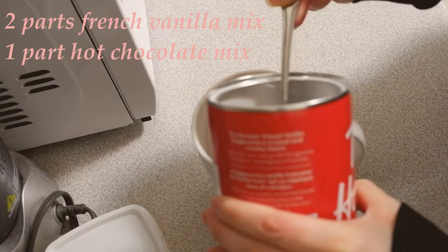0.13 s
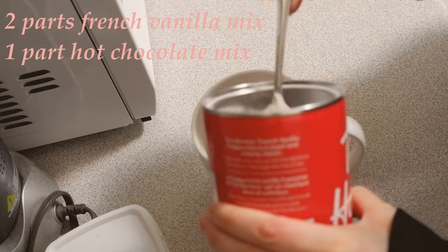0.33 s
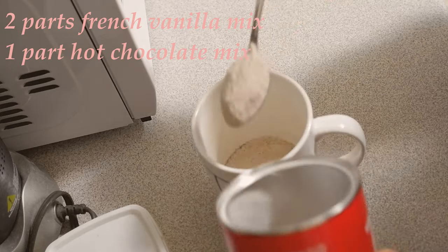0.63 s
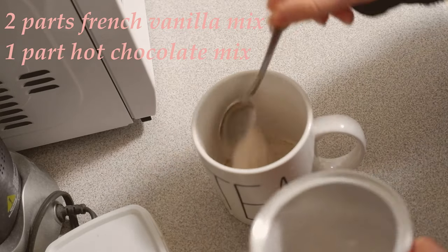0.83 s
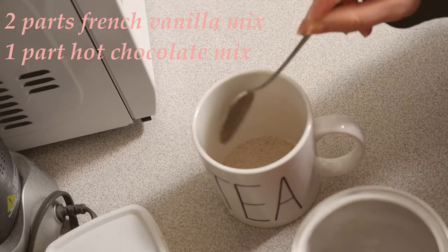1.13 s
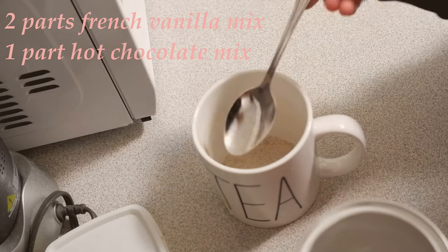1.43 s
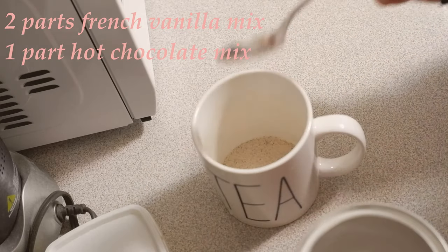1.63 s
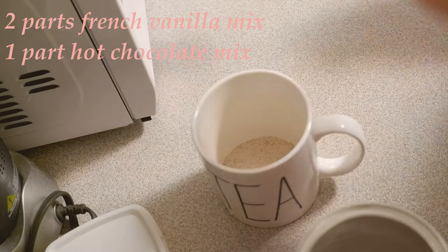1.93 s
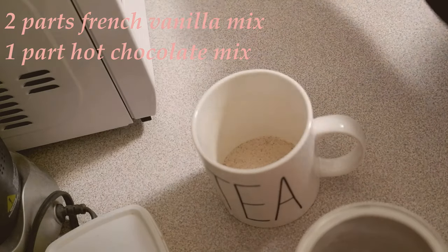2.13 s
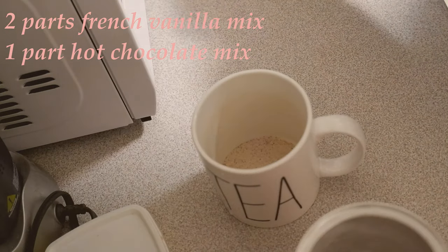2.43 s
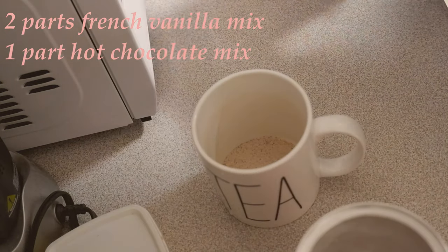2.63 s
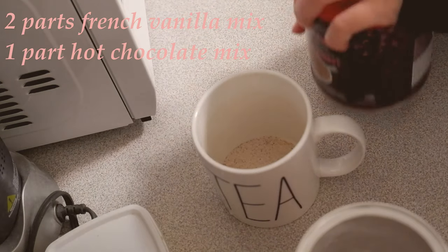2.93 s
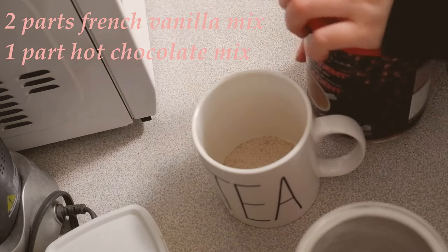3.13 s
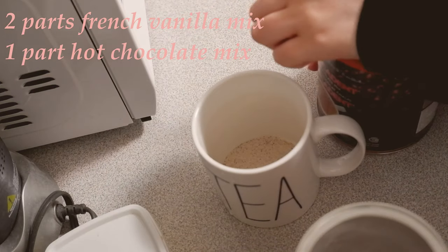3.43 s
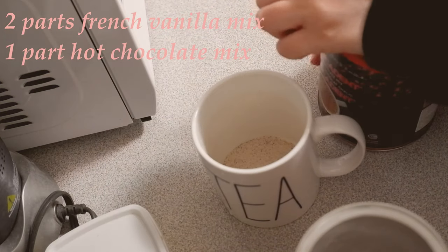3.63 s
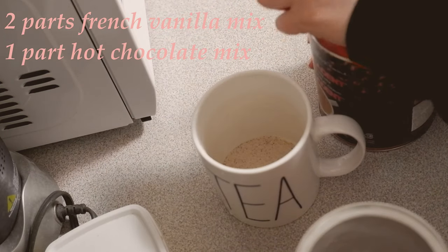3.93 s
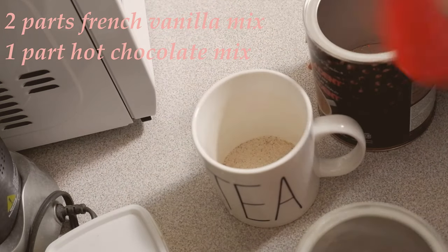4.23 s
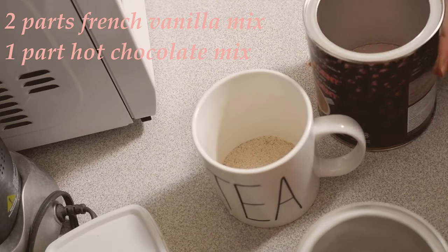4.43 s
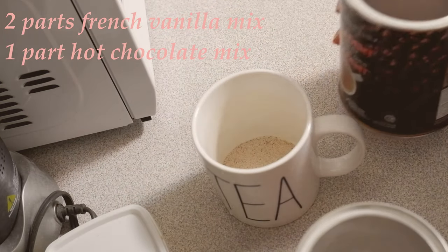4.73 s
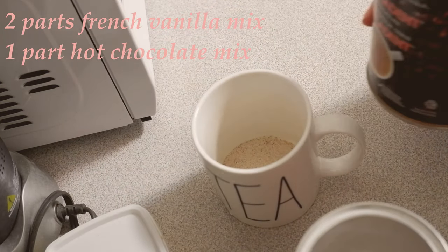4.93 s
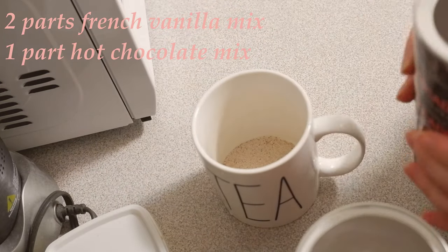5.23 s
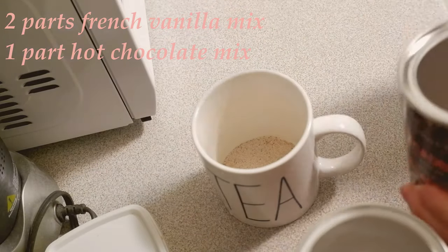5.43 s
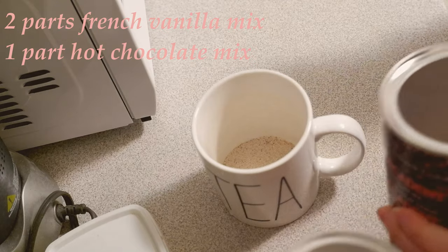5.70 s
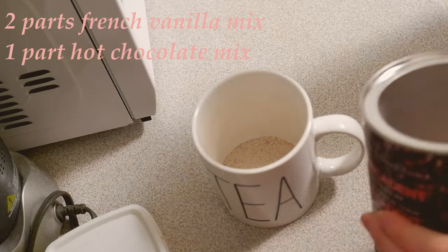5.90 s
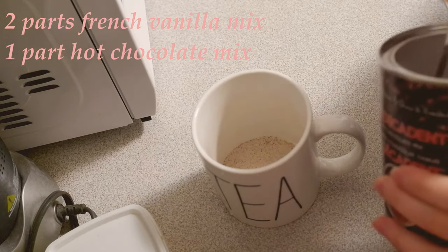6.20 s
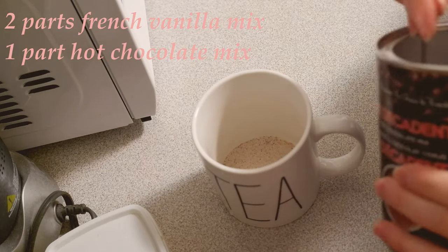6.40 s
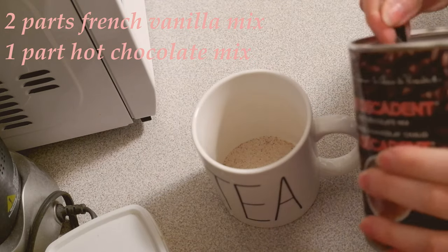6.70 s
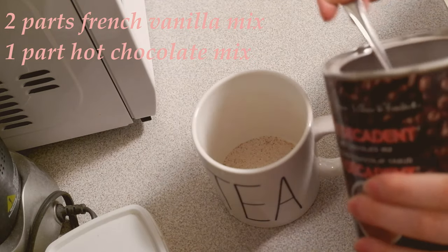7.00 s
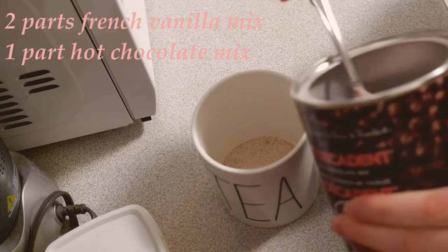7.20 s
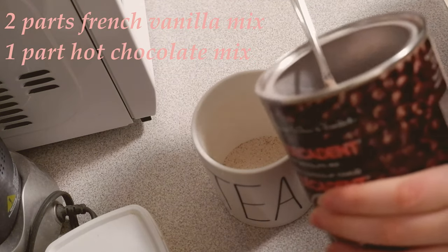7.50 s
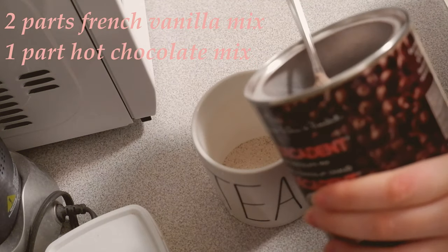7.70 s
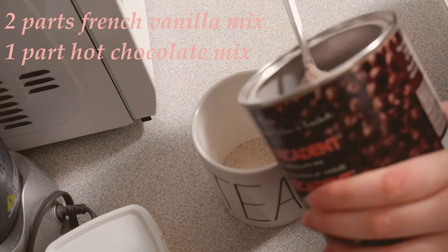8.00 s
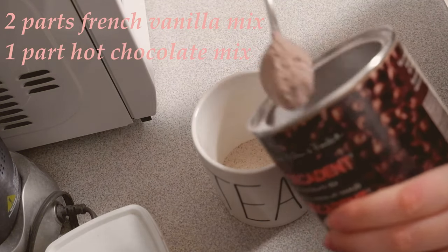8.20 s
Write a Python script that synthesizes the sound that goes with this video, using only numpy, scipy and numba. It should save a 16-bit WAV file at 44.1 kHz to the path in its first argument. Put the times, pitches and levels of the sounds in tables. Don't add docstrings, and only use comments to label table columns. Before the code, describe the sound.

Over a low fridge hum, a spoon knocks a mug, a can thuds down, its lid pops off and clacks, then a spoon digs in powder.

```python
import sys
import numpy as np
from scipy import signal
from scipy.fft import rfft, irfft, next_fast_len
from scipy.io import wavfile
from scipy.ndimage import uniform_filter1d
from numba import njit

SR = 44100
rng = np.random.default_rng(int(sys.argv[2]) if len(sys.argv) > 2 else 0)


def boost(x):
    u = np.asarray(x, float) / 20
    return 10 ** u


def generate_wav(sig):
    pcm = np.round(np.clip(np.atleast_2d(sig).T, -1, 1) * 32767).astype(np.int16)
    wavfile.write(sys.argv[1], SR, pcm)


N = 368235
T = np.arange(N) / SR


def shape(x, points, in_db=True):
    size = next_fast_len(x.shape[-1], real=True)
    log_hz = np.log(np.fft.rfftfreq(size, 1 / SR) + 1)
    point_hz, value = np.transpose(points)
    gain = np.interp(log_hz, np.log(point_hz), value)
    if in_db:
        gain = boost(gain)
    return irfft(rfft(x, size) * gain, size)[..., :x.shape[-1]]


def band(x, lo_hz, hi_hz):
    return signal.sosfilt(signal.butter(2, [lo_hz, hi_hz], "bandpass", fs=SR, output="sos"), x)


def unit(x):
    return x / np.sqrt(np.mean(x ** 2))


def head_unit(x):
    return x / np.sqrt(np.mean(x[..., :300] ** 2))


def walk(rate_hz, size=N):
    hold = int(SR / rate_hz)
    steps = np.repeat(rng.standard_normal(size // hold + 1), hold)
    return unit(uniform_filter1d(uniform_filter1d(steps, hold), hold)[:size])


def left_right(db):
    return boost(np.array([[db], [-db]]) / 2)


# hz, side_over_mid (plain ratio)
UNLIKE = [(100, 0.035), (700, 0.24), (1500, 0.59), (3000, 0.72), (8000, 0.84)]


def diffuse(size=N):
    mid, side = rng.standard_normal((2, size))
    return mid + shape(side, UNLIKE, in_db=False) * np.array([[1], [-1]])


# pitch_hz, fall_by_60_db_s
ROOM_T60 = [(150, 0.53), (600, 0.23), (2000, 0.24), (6000, 0.14), (14000, 0.46)]


def room(x):
    tail, t = 0, T[:16384]
    hz, t60_s = np.transpose(ROOM_T60)
    for centre in 90 * 2 ** np.arange(0, 7.5):
        t60 = np.interp(np.log(centre), np.log(hz), t60_s)
        fade = 1000. ** (-t / t60) * np.clip(t / 0.0057, 0, 1)
        tail = tail + band(diffuse(size=16384), centre / np.sqrt(2), centre * np.sqrt(2)) * fade
    tail = tail / np.sqrt(np.sum(tail[0] ** 2))
    return x + boost(-5) * signal.fftconvolve(x.mean(axis=0)[None], tail)[:, :N]


# pitch_hz, level_db, wander_hz, waver_db
HUM = [(58.8, -40, 0.18, -0.5), (119.8, -42, 1, -0.5)]
# pitch_hz, width_hz, level_db
BOOM = [(174.2, 18, -49.5), (231.2, 9.8, -42), (252.3, 10.9, -46), (327.6, 13, -60.5), (431.3, 18, -60),
        (983.4, 17, -66)]
# pitch_hz, level_db
AIR = [(15, -44), (25, -10.5), (53, -19.5), (122, -4), (178, -5), (240, -6), (305, -9.5), (552, -15.5),
       (871, -26), (970, -22), (1660, -32), (2170, -32.5), (4150, -45.5), (9810, -54.5), (15500, -68)]


def fridge():
    out = boost(-42.5 + .5 * walk(3.01)) * unit(shape(diffuse(), AIR))
    for hz, db, wander_hz, waver_db in HUM:
        phase = 2 * np.pi * np.cumsum(hz + wander_hz * walk(18)) / SR
        out = out + boost(db + waver_db * walk(7.8)) * np.sqrt(2) * np.sin(phase)
    for hz, width_hz, db in BOOM:
        out = out + boost(db) * unit(band(diffuse(), hz - width_hz / 2, hz + width_hz / 2))
    return out


def played(strokes, over_db=0, lean=0):
    t, rows = T[::32], np.array(strokes).T[:, :, None]
    peak_s, rise_s, fall_s, level_db = rows[:4]
    away = np.maximum((peak_s - t) / np.abs(rise_s), (t - peak_s) / np.abs(fall_s))
    db = level_db + over_db + lean * rows[-1] - 15 * np.minimum(away, 20) ** 1.35
    return np.interp(T, t, np.sqrt(np.sum(boost(db) ** 2, axis=0)))


# strongest_s, rise_s, fall_s, level_db
COUNTER = [
    (1.152, 0.0037, 0.042, -27),
    (1.279, 0.031, 0.023, -35),
    (1.58, 0.04, 0.068, -33),
    (3.578, 0.02, 0.042, -25.5),
    (3.79, 0.0091, 0.024, -24),
    (5.502, 0.032, 0.096, -34),
    (5.75, 0.17, .2, -35),
    (5.86, 0.067, 0.18, -32.5),
]


def counter_thumps():
    return played(COUNTER) * unit(band(rng.standard_normal(N), 69, 167))


def shaken(slips, modes):
    out, size = 0, slips.shape[1]
    for hz, db, t60 in modes:
        radius, turn = 1000. ** (-1 / (t60 * SR)), 2 * np.pi * hz / SR
        drift = np.repeat(walk(32 * 14, size=size // 32 + 1), 32)[:size]
        resonator = [0, np.sin(turn)], [1, -2 * radius * np.cos(turn), radius ** 2]
        out = out + signal.lfilter(*resonator, slips * boost(db + 2.5 * drift))
    return out


# rumble_over_scrape_db, hiss_over_scrape_db
RUBBED = dict(hands=(0.25, -8), lid=(-10, -22), stab=(-10, -11.5), dig=(-28, -11.5), scoop=(-0.5, -23))


def rubbing(strokes, kind, modes, edges_hz, drag_db, body_share):
    first = int(max(strokes[0][0] - .5, 0) * SR)
    last = min(int((strokes[-1][0] + .5) * SR), N)
    size, out = last - first, np.zeros((2, N))
    grain_db = 2.5 * walk(350, size=size) + drag_db * walk(60, size=size)
    slips = diffuse(size=size) * boost(grain_db)
    bare = unit(shape(slips, [(300, 3.5), (1500, -7.5), (5000, -20.5), (14000, -21.5)]))
    rub = body_share * unit(shaken(slips, modes)) + (1 - body_share) * bare
    rumble_db, hiss_db = RUBBED[kind]
    for k, over_db in enumerate((rumble_db, 0, hiss_db)):
        lo, hi = edges_hz[k:k + 2]
        part = unit(band(band(rub, lo, hi), 1.02 * lo, 1.03 * hi))
        out[:, first:last] += played(strokes, over_db, lean=k - 1)[first:last] * part
    return out


def ring(modes, detune, favour_hz=0):
    hz, db, t60 = np.transpose(modes)[:, :, None]
    share, shift, sign = rng.standard_normal((3, len(modes), 1))
    if favour_hz:
        db = db - 3.1 * np.abs(np.log2(hz / favour_hz))
        sign = sign + 1
    t = T[:4096]
    wave = np.sign(sign) * np.sin(2 * np.pi * hz * (1 + detune * shift) * t)
    return np.sum(boost(db + 3.3 * share) * wave * 1000. ** (-t / t60), axis=0)


# bright_tick_over_crack_db, left_minus_right_db
STRUCK = dict(mug=(-18, -3), can=(-9, -1.9), pry=(-15, -2.2), seal=(7, -2.2), lid=(1.4, -3.5),
          spoon=(-6, -2.5), scoop=(-15, -1.1), finger=(-11.5, -1.9))


def knocks(rows, kind, body, split_hz, push_s, crack_s, rattle_db, rattle_s, edge=None, edge_db=-2):
    out = np.zeros((2, N + 4096))
    t = T[:4096]
    push = np.hanning(int(push_s * SR) + 3)
    crack = np.exp(-t / crack_s) + 1.1 * np.exp(-t / 0.0006)
    tick_db, pan_db = STRUCK[kind]
    for s, body_db, hard_db, hz in rows:
        rattle = band(diffuse(size=4096) * np.exp(-t / rattle_s), hz / 2, 2 * hz)
        rattle = head_unit(band(rattle, 190, split_hz))
        body_ring = np.convolve(ring(body, 0.015, favour_hz=hz), push)[:4096]
        low = head_unit(body_ring) + boost(rattle_db) * rattle
        mid = head_unit(band(diffuse(size=4096) * crack, split_hz, 5500))
        if edge:
            mid = mid + boost(edge_db) * head_unit(ring(edge, 0.0075))
        top = head_unit(band(diffuse(size=4096) * crack, 4400, 12600))
        hit = boost(body_db) * (low + boost(hard_db) * (mid + boost(tick_db) * top))
        i = int(s * SR)
        out[:, i:i + 4096] += hit * left_right(pan_db)
    return out[:, :N]


# pitch_hz, level_db, fall_by_60_db_s
TIN = [(450, 13.5, 0.019), (607, 19.5, 0.039), (1050, -18, 0.026), (1250, 13, 0.031), (1420, 10, 0.065),
       (1658, 4.5, 0.04), (2072, 7.5, 0.027), (2474, 7, 0.029)]
# strongest_s, rise_s, fall_s, pressure_db, brightness_db
HANDS = [(0.0, .01, 0.21, -76.5, 17.5), (.238, 0.045, 0.14, -73.5, -27), (.422, 0.045, 0.11, -65.5, -24),
         (1.42, 0.034, 0.21, -60.5, -6), (1.54, 0.033, 0.046, -54, -19.5), (1.75, 0.074, 0.11, -58, -7),
         (2.2, 1, 0.22, -62.5, 0), (2.33, 0.019, 0.13, -50, -5.5), (2.46, 0.054, 0.06, -53.5, -21),
         (2.8, 0.44, 0.14, -58.5, -0.5), (2.98, .1, 0.68, -60.5, -7), (3.22, 0.12, 0.11, -53, 0.5),
         (3.51, 0.25, 0.079, -52, -1.5), (4.08, 0.19, 0.41, -55, -9), (4.56, 0.16, 0.13, -57, -10),
         (5.18, .012, 0.35, -54.5, 7), (5.402, 0.018, 0.068, -48.5, 10), (5.63, 0.041, 0.1, -49.5, -8.5),
         (5.76, 0.12, 0.11, -47, -7), (5.86, 0.2, .11, -41, -9)]


def hands_rub():
    return rubbing(HANDS, "hands", TIN, (300, 1300, 4000, 13000), drag_db=.8, body_share=.13)


# start_s, level_db, crack_over_body_db, pitch_hz
FINGER_TICKS = [(1.796, -38, -9, 608), (2.23, -47.5, -1.5, 584), (2.325, -54, 7, 686),
                (2.421, -41.5, -4.5, 544), (2.464, -31, -20, 923), (2.656, -45.5, -3, 560),
                (2.866, -32, -26, 1440), (2.895, -35, -16, 501), (2.916, -38.5, -7.5, 1080),
                (3.097, -38.5, -7.5, 773), (3.199, -39, -3, 1370), (5.171, -51, 14, 533),
                (5.271, -47, 9, 573), (5.368, -35, -2.5, 544), (5.494, -36, -12, 514)]


def finger_ticks():
    return knocks(FINGER_TICKS, "finger", TIN, 1830,
                  push_s=0.00033, crack_s=0.01, rattle_db=-1.5, rattle_s=0.012)


# start_s, level_db, pitch_hz
BUCKLES = [
    (5.659, -22.5, 585),
    (5.744, -28, 620),
    (5.796, -20.5, 560),
    (5.833, -19, 620),
    (5.853, -15, 786),
    (5.862, -23, 912),
    (5.878, -21, 700),
    (5.898, -24, 500),
    (5.94, -23.5, 640),
]


def wall_buckles():
    folds = [(s, db, -32, hz) for s, db, hz in BUCKLES]
    return knocks(folds, "finger", TIN, 1800, push_s=.0007, crack_s=.005, rattle_db=-8, rattle_s=.005)


# pitch_hz, level_db, fall_by_60_db_s
CAN = [(117, 7, 0.13), (250, -9, 0.08), (400, -1, 0.088), (578, 8.5, 0.1), (620, 19, 0.028),
       (739, 7, 0.097), (862, 11.5, 0.041), (990, -6, 0.036), (1250, 6, 0.027), (1356, 13.5, 0.045),
       (1810, -15, .04), (2536, 0, .02)]
# start_s, level_db, crack_over_body_db, pitch_hz
CAN_KNOCKS = [
    (3.541, -5, -28, 784),
    (3.5443, -8.5, -29, 970),
    (3.551, -12, -32.5, 780),
    (4.22, -35, -9, 1150),
]


def can_set_down():
    return knocks(CAN_KNOCKS, "can", CAN, 2200, push_s=.0004, crack_s=.005, rattle_db=-2, rattle_s=.009)


# pitch_hz, level_db, fall_by_60_db_s
RIM = [(238, -13, 0.037), (373, 5.5, 0.023), (544, -1, 0.074), (638, 0, 0.036), (810, -11, .04),
       (1020, -30, .04), (1400, -6, 0.032), (1714, -4, 0.048), (1940, 5, 0.031), (2240, -13, 0.018),
       (2600, -19, 0.02), (3000, -6, 0.016)]
# start_s, level_db, crack_over_body_db, pitch_hz
PRY_KNOCKS = [
    (3.742, -29.5, -17, 620),
    (3.7808, -10, -19, 450),
    (3.7843, -12, -28, 1510),
    (3.7895, -25, -27, 500),
    (3.959, -26, -30, 2250),
    (4.009, -38, -8, 589),
    (4.294, -28, -22, 1650),
    (4.301, -28.5, -7.5, 1640),
]
# start_s, level_db, crack_over_body_db, pitch_hz
SEAL_TICKS = [
    (4.134, -26.5, -22, 1810),
    (4.143, -27, -11, 1810),
]


def lid_pried():
    pries = knocks(PRY_KNOCKS, "pry", RIM, 2700, push_s=.0003, crack_s=.004, rattle_db=-2, rattle_s=.007)
    return pries + knocks(SEAL_TICKS, "seal", RIM, 2300,
                          push_s=.0003, crack_s=.004, rattle_db=-4, rattle_s=.007)


# start_s, level_db, pitch_hz
FLAPS = [
    (4.1531, -16.5, 470),
    (4.1745, -16, 470),
    (4.1885, -19, 435),
    (4.217, -28, 450),
    (4.241, -34, 500),
]


def pop():
    out, t = np.zeros(N), T[:4096]
    # start_s, level_db, pitch_hz, pitch rise (share), swell_s, length_s
    rings = [(4.1356, -2, 485, .4, .004, .0255)]
    rings += [(*flap, 0, .002, .024) for flap in FLAPS]
    for s, db, hz, rise, swell_s, length_s in rings:
        grow = np.sin(np.pi / 2 * np.clip(t / (2 * swell_s), 0, 1)) ** 3
        choke = 1000. ** (-(t / length_s) ** 7)
        phase = 2 * np.pi * hz * np.cumsum(1 - rise * np.exp(-t / (2 * swell_s))) / SR
        out[int(s * SR):][:4096] += boost(db) * grow * choke * np.sin(phase)
    return out


# pitch_hz, level_db, fall_by_60_db_s
LID_EDGE = [(1073, 7, 0.06), (1620, 1, 0.04), (2210, 13, 0.022), (2830, -8, 0.017), (3250, 5, 0.022),
            (3450, 3, .025)]
# strongest_s, rise_s, fall_s, pressure_db, brightness_db
LID_SLIDE = [
    (3.85, .03, 0.58, -58, 2),
    (3.964, 0.0056, 0.029, -34.5, -2),
    (4.302, 0.026, 0.055, -42, 0.5),
    (4.7, 0.058, 0.057, -50, -8),
    (4.775, .006, .04, -50, 2),
    (4.825, 0.013, 0.022, -45.5, -11),
    (4.92, 0.025, .05, -49, 0),
    (5.0, 0.071, 0.1, -41, -6),
]


def lid_slides():
    return rubbing(LID_SLIDE, "lid", LID_EDGE, (500, 1300, 4800, 13000), drag_db=.8, body_share=.42)


# pitch_hz, level_db, fall_by_60_db_s
LID = [(637, 3, 0.072), (835, -11, .03), (1000, 1, 0.047), (1250, -2.5, 0.051), (1580, -3, 0.052),
       (1800, 2, .03), (1980, 6, 0.02), (2180, 9, 0.02), (2410, -7, 0.027), (2800, -2, .02)]
# start_s, level_db, crack_over_body_db, pitch_hz
LID_KNOCKS = [
    (4.594, -12, -25.5, 1250),
    (4.621, -20.5, -23, 1820),
    (4.7665, -33.5, -13.5, 2210),
    (4.811, -25.5, -26.5, 1600),
    (4.822, -29.5, -22, 980),
]


def lid_drops():
    return knocks(LID_KNOCKS, "lid", LID, 2900, push_s=0.0001, crack_s=0.0063, rattle_db=0.5, rattle_s=0.0068)


# pitch_hz, level_db, fall_by_60_db_s
SPOON = [(2790, -3, .045), (3320, -2, .05), (3680, -9, .03), (4060, -3, .04), (4280, 2, .05),
         (5800, 0, .035), (6050, 1, .035), (6600, -8, .025), (7050, -10, .02)]
# strongest_s, rise_s, fall_s, pressure_db, brightness_db
STABBING = [
    (6.44, 0.0074, 0.052, -43.5, -6),
    (6.548, 0.037, 0.095, -43, -1),
    (6.66, 0.12, 0.12, -45.5, -3),
    (6.74, 0.089, 0.094, -40.5, -0.5),
    (6.906, 0.18, 0.11, -49, 3),
    (7.0, 0.026, 0.05, -51.5, -2),
]
# strongest_s, rise_s, fall_s, pressure_db, brightness_db
DIGGING = [
    (7.09, 0.016, 0.074, -36, 2.5),
    (7.15, 0.051, 0.12, -49, 10),
    (7.214, 0.078, 0.022, -43, -15),
    (7.266, 0.033, 0.051, -43, -11),
]
# strongest_s, rise_s, fall_s, pressure_db, brightness_db
SCOOPING = [
    (7.42, 0.022, 0.026, -66, -20),
    (7.54, .08, 0.11, -57.5, -4),
    (7.625, 0.033, .05, -48.5, -2),
    (7.69, 0.044, 0.09, -49, 0),
    (7.872, 0.0053, 0.081, -50, 1.5),
    (8.128, .008, 0.023, -66, -22),
    (8.272, 0.011, .025, -70, -30),
    (8.35, 0.02, .03, -60, 16),
]


def spoon_in_powder():
    stab = rubbing(STABBING, "stab", TIN + SPOON[:4], (400, 1300, 5000, 11000), drag_db=.6, body_share=.36)
    dig = rubbing(DIGGING, "dig", TIN + SPOON, (400, 1650, 5000, 10500), drag_db=.8, body_share=.45)
    scoop = rubbing(SCOOPING, "scoop", TIN + SPOON, (400, 1300, 5000, 12000), drag_db=2, body_share=.6)
    return stab + dig + scoop


# start_s, level_db, crack_over_body_db, pitch_hz
SPOON_TICKS = [(6.4243, -21.5, -13, 1250), (6.431, -34.5, -15, 640), (6.466, -30, -21, 2000),
               (6.514, -52, -8, 1700), (6.5415, -37, -6, 1200), (6.603, -40, -20, 2050),
               (6.658, -27.5, -1.5, 2070), (6.686, -25, -3, 1250), (6.692, -31, -25, 2400),
               (6.726, -37, -4, 2400), (6.7535, -24.5, -4.5, 611), (6.81, -30.5, -13, 1250),
               (6.881, -40, 2, 2400), (6.896, -30, -2, 630), (6.957, -45, 0, 2400),
               (7.074, -17.5, -11.5, 1400), (7.0785, -17, -19, 560), (7.162, -43, 2, 2450),
               (7.2055, -32, -12, 1300), (7.224, -35.5, -4, 1420), (7.2693, -38, -2.5, 2400),
               (7.873, -33.5, -13, 630)]
# start_s, level_db, crack_over_body_db, pitch_hz
SCOOP_TICKS = [
    (7.256, -33, -30, 620),
    (7.621, -46, -5.5, 646),
    (7.689, -32, -20.5, 640),
    (7.78, -32, -37, 620),
    (7.822, -37.5, -17, 1220),
    (7.944, -37.5, -18, 533),
    (8.13, -36.5, -37, 990),
    (8.163, -43, -30, 600),
    (8.23, -45, -30, 600),
    (8.268, -34, -37, 790),
]


def spoon_on_can():
    ticks = knocks(SPOON_TICKS, "spoon", TIN, 1800, push_s=0.00016, crack_s=0.0088,
                   rattle_db=-12.0, rattle_s=0.0011, edge=SPOON)
    return ticks + knocks(SCOOP_TICKS, "scoop", TIN, 2400, push_s=0.0004, crack_s=.008,
                          rattle_db=-3, rattle_s=0.005, edge=SPOON[3:7], edge_db=6)


# pitch_hz, level_db, fall_by_60_db_s
MUG = [(250, -14, 0.09), (327, -17, 0.051), (404.5, -6, 0.17), (544, -3, 0.11), (640, 9.5, 0.02),
       (754, 1, 0.039), (845, 1, 0.041), (1033, -3, 0.05), (1360, -11, 0.03), (1520, -17, .04),
       (1900, -8, 0.03)]
# start_s, level_db, crack_over_body_db, pitch_hz
MUG_KNOCKS = [
    (1.1466, -3.5, -31.5, 634),
    (1.1535, -12.5, -34, 700),
    (1.3662, -13, -34, 700),
    (1.3735, -16.5, -40, 600),
    (1.5345, -22, -40, 700),
    (1.5505, -18.5, -46, 520),
]


def spoon_on_mug():
    return knocks(MUG_KNOCKS, "mug", MUG, 1800, push_s=0.0008, crack_s=0.011, rattle_db=-6.5, rattle_s=0.0085)


def scene():
    hits = finger_ticks() + wall_buckles() + can_set_down() + lid_pried() + lid_drops()
    hits = hits + spoon_on_can() + spoon_on_mug()
    steady = fridge() + counter_thumps() + hands_rub() + lid_slides() + spoon_in_powder()
    air = pop()
    close = (0.77 * air + steady) * left_right(-2)
    return room(boost(-9.0) * hits + 0.21 * air) + close


# pitch_hz, level_db
MIC = [(9000, -1.5), (12000, -1.5), (14000, -1.5), (15600, -10), (15800, -61)]


def microphone(dry):
    return shape(np.array([np.roll(dry[0], 2), dry[1]]), MIC)


@njit
def follow(x, attack, release):
    out, level = np.empty(len(x)), 0.
    for i in range(len(x)):
        level += (x[i] - level) * (attack if x[i] > level else release)
        out[i] = level
    return out


def gain_control(heard):
    attack_s, release_s = .04, .45
    meter = follow(np.abs(heard).max(axis=0), 1 / (attack_s * SR), 1 / (release_s * SR))
    return heard * np.minimum(1, boost(-26.5) / (meter + 1e-9)) ** 0.34


def band_limit(x):
    return signal.sosfilt(signal.butter(12, 15770, fs=SR, output="sos"), x)


def record(dry):
    levelled = gain_control(microphone(dry))
    rounded = 1.3 * np.tanh(levelled / 1.3)
    return band_limit(rounded)


dry = scene()
out = record(dry)
generate_wav(out)
```